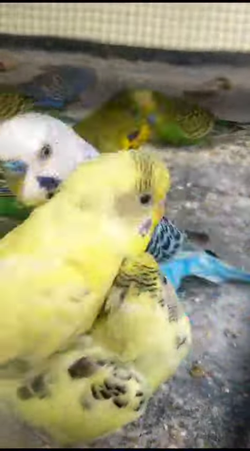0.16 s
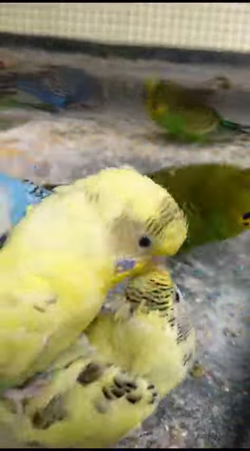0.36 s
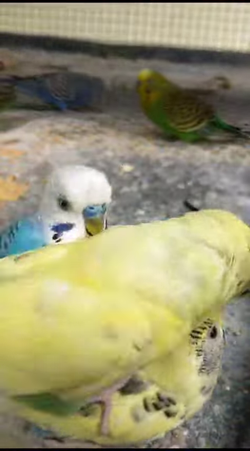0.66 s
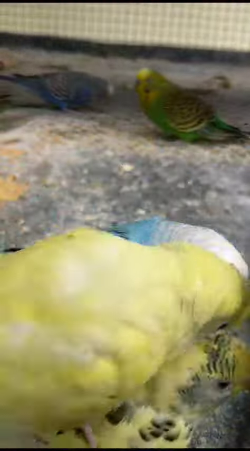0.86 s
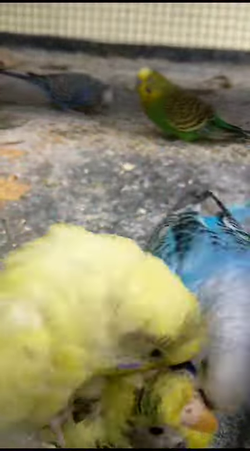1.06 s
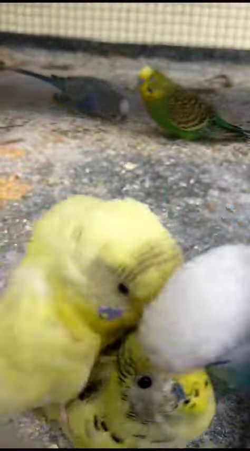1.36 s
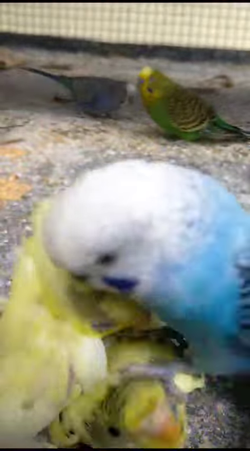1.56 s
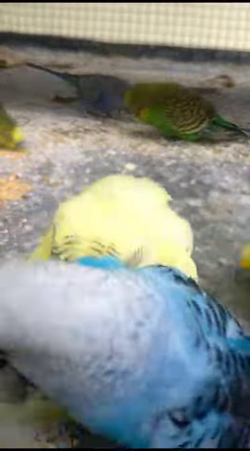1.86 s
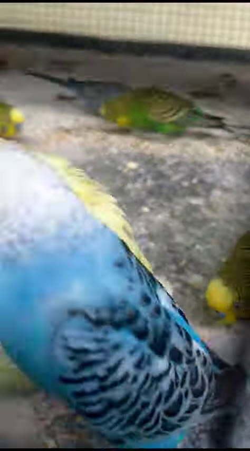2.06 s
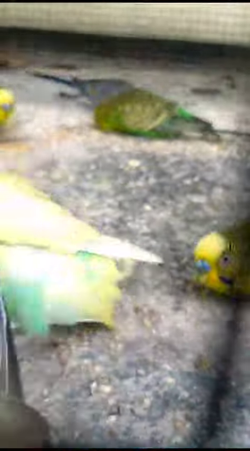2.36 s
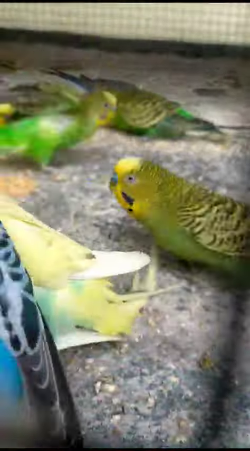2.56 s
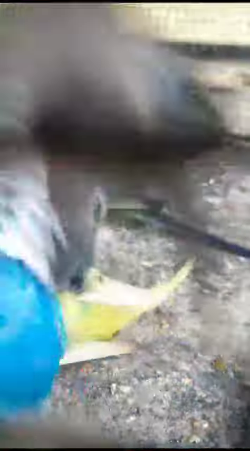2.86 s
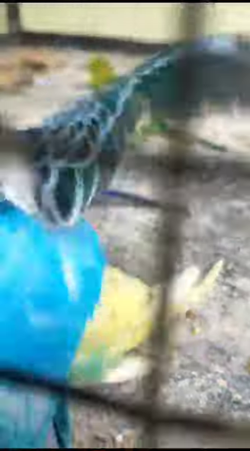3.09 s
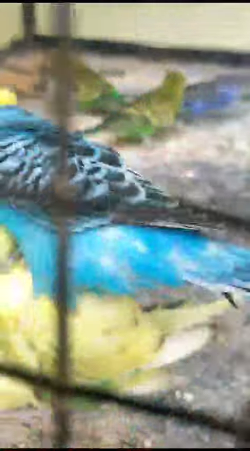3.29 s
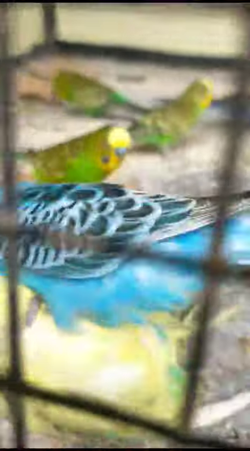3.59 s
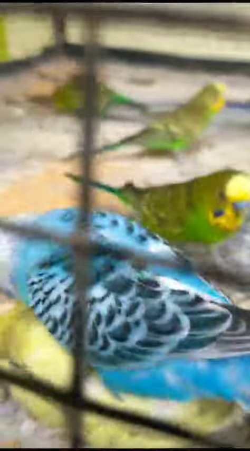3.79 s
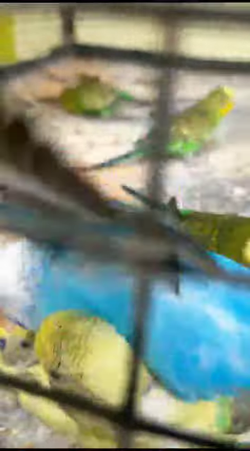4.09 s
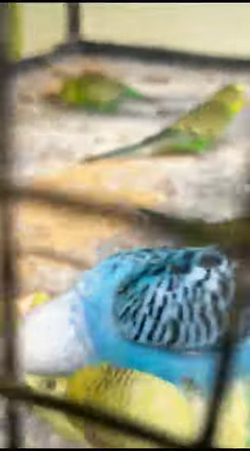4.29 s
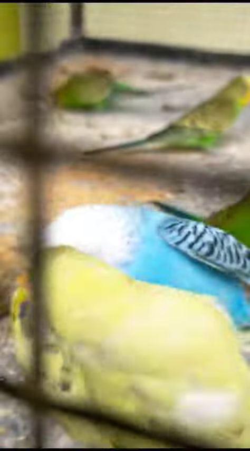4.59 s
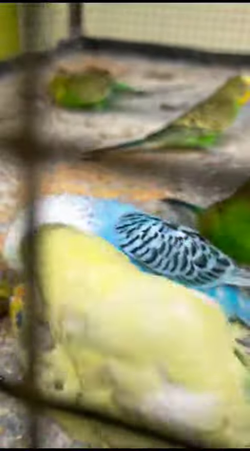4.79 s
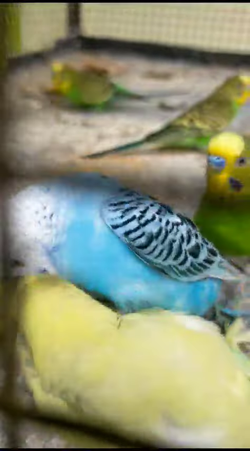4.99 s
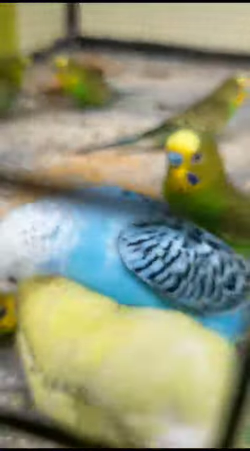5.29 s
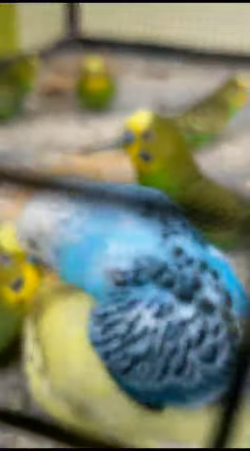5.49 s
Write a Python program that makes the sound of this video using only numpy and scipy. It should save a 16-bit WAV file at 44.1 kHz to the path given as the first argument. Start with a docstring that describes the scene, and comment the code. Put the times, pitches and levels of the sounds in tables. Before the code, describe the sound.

Budgies squawk, chirp and warble together in a dense chorus inside a wire cage, over a faint low rumble.

```python
"""A wire aviary, the microphone close to a chattering flock of small parrots.
Near birds rasp pulsed squawks, air chopped by a flapping membrane, and the syrinx sounds gliding
whistles, grating calls and low clucks. Beaks and claws tick on wire and grit. The birds behind blur
into a chorus of chirps; air and far traffic rumble below, with a faint hum."""
import sys
import numpy as np
from scipy import signal
from scipy.fft import rfft, irfft, next_fast_len
from scipy.io import wavfile
from scipy.ndimage import uniform_filter1d

SR = 44100
rng = np.random.default_rng(int(sys.argv[2]) if len(sys.argv) > 2 else 0)


def log_audio(samples):
    """Write samples as a 16-bit WAV file to the path given in sys.argv[1]."""
    # one column per channel
    frames = np.atleast_2d(samples).T
    # limit to full scale, then quantise
    limited = np.clip(frames, -1, 1)
    pcm = np.round(limited * 32767).astype(np.int16)
    wavfile.write(sys.argv[1], SR, pcm)


N = 249165

# Rasp of a squawk through throat and beak: (frequency [Hz], level [dB])
RASP_SPECTRUM = [(500, -99), (1000, -18.5), (2400, -5), (4500, -3), (6700, -5.5), (8000, -5.5), (9000, -19),
                 (11200, -14.5), (12400, -18.5), (14300, -9.5), (16000, -13)]
# Harsh squawks, close to the microphone:
# (time [s], length [s], level [dB], beak resonance [Hz], pulse depth [0-1], treble gain [dB])
NEAR_SQUAWKS = [(-.03, 0.082, -24.5, 6800, 0.66, -7), (0.046, 0.11, -32, 6740, 0, 13.5),
                (0.148, 0.13, -27, 6740, 0.14, 13), (.558, 0.04, -27, 3630, 0.8, 5),
                (0.832, 0.04, -28, 8000, 0.4, 3), (.969, 0.089, -20.5, 6560, 0.7, -3.5),
                (1.048, 0.11, -34, 5260, 0.06, 11.5), (1.134, 0.11, -26.5, 5500, 0.1, -7),
                (1.233, 0.091, -27.5, 5470, 0, -11), (1.442, 0.066, -31, 4600, 0.1, 10),
                (1.562, 0.12, -27, 6250, 0, -1.5), (1.845, 0.12, -28, 6600, 0.12, -5),
                (2.368, 0.099, -29, 6340, 0.04, 15), (2.531, 0.12, -29, 7140, 0.22, -10),
                (2.71, 0.12, -29, 6900, 0, 4.5), (3.088, 0.15, -22.5, 6470, 0.08, 0),
                (3.223, 0.096, -32, 4900, 0, 4), (3.362, 0.1, -36.5, 6340, 0.2, 14.5),
                (3.594, 0.095, -23, 6750, 0, -21), (3.668, 0.074, -38, 7160, 0.2, 13),
                (3.741, 0.08, -20.5, 6800, 0.47, 2), (3.851, 0.12, -25.5, 6600, 0.24, 12.5),
                (3.986, 0.11, -29, 6800, 0.14, 14), (4.125, 0.11, -24.5, 6350, 0.2, -22),
                (4.231, 0.076, -20.5, 5800, 0.23, 5), (4.405, 0.13, -24, 5500, 0.95, 2),
                (4.502, 0.096, -27.5, 7100, 0, 13), (4.62, 0.099, -21.5, 6500, 0.37, -8),
                (4.844, 0.089, -22.5, 6050, 0.08, 12.5), (4.978, 0.12, -24, 6600, 0.26, -29),
                (5.251, 0.08, -25, 5900, 0.2, 11.5), (5.452, 0.14, -27.5, 5300, 0.07, 1.5)]


def squawks(flaps_per_s=188, grit_db=1.4, swell_db=.5, beak_rise=1.001):
    """Turbulent air, chopped by the membrane flapping shut; the open beak rings at its own pitch."""
    out, jitter, uneven = np.zeros(N), drift(11), drift(200)
    air = tongue_and_beak(colour(rng.standard_normal(N), RASP_SPECTRUM))
    treble = signal.butter(4, 9500, "high", fs=SR, output="sos")
    paces = rng.standard_normal(len(NEAR_SQUAWKS))
    for (start, length, db, beak_hz, depth, treble_db), pace in zip(NEAR_SQUAWKS, paces):
        u, envelope = swell(length, edge_s=.04)
        envelope *= amp(db + swell_db * (u - 2.5))
        at = min(max(round(start * SR), 0), N - len(u))
        span, t = slice(at, at + len(u)), np.arange(len(u)) / SR
        phase = 2 * np.pi * flaps_per_s * (1 + .04 * pace) * t + .4 * jitter[span]
        gate = rms_one((1 - np.clip(depth, 0, 1) * np.cos(phase)) ** 1.4)
        puffs = air[span] * gate * envelope * amp(grit_db * uneven[span])   # uneven slaps roughen it
        bounce = round(SR * .0005 * np.exp(.5 * pace))   # a copy off the floor combs the rasp
        puffs[bounce:] += .3 * puffs[:-bounce]
        ring = sum(share * signal.lfilter(*signal.iirpeak(hz, Q=6, fs=SR), puffs)
                   for share, hz in ((1 - u, beak_hz / beak_rise), (u, beak_hz * beak_rise)))
        add(out, puffs + 1.74 * ring + (amp(treble_db) - 1) * signal.sosfilt(treble, puffs), start)
    return out


def tongue_and_beak(rasp, wander_db=3.2, wander_hz=45):
    """Bands of the rasp swell apart as tongue and beak move."""
    out, edges_hz = np.zeros(N), np.geomspace(700, 19000, 10)
    for k in range(len(edges_hz) - 1):
        band = signal.sosfilt(signal.butter(2, edges_hz[k:k + 2], "band", fs=SR, output="sos"), rasp)
        out += (-1) ** k * amp(wander_db * drift(wander_hz)) * band   # alternate signs join bands evenly
    return rms_one(out)


def syrinx(rows, waver, hoarse, overtone_db, edge_s):
    """The syrinx gives a near sine with weak overtones; its pitch trembles and breath roughens it."""
    out, trembles = np.zeros(N), np.array([drift(hz) for hz in (57.5, 40, 353, 25)])
    for (start, length, first_hz, last_hz, db), skip in zip(rows, rng.random(len(rows))):
        u, envelope = swell(length, edge_s)
        at = int(skip * N * .9)
        wobble, flutter, breath, flash = trembles[:, at:at + len(u)]
        glide = np.sin(np.pi / 2 * u) if last_hz > first_hz else u   # a rise settles, a fall is even
        hz = (first_hz + (last_hz - first_hz) * glide) * (1 + waver * wobble)
        phase = 2 * np.pi * np.cumsum(hz) / SR
        overtones = sum(np.sin(k * phase) / (k - 1) ** 2 * beak_gain(k * hz) for k in (2, 3, 4, 5))
        # overtones break in and out, and are stronger on low notes
        richness = amp(overtone_db + 9 * np.minimum(flash, 1.2)) * (3000 / first_hz) ** .5
        strength = amp(db + .74 * flutter) * (1 - hoarse + hoarse * breath)
        add(out, np.sqrt(2) * strength * envelope * (np.sin(phase) + richness * overtones), start)
    return out


def beak_gain(hz, ring_hz=7700, half_width_hz=800, fade_hz=14500):
    """The open beak lifts overtones near its ring; the highest fade."""
    lift = 1 + 6 / (1 + ((hz - ring_hz) / half_width_hz) ** 2)
    return lift / (1 + (hz / fade_hz) ** 12)


# Whistles of the near birds: (time [s], length [s], first pitch [Hz], last pitch [Hz], level [dB])
NEAR_WHISTLES = [(0.112, 0.048, 3270, 3530, -22.5), (0.14, 0.034, 2744, 2143, -22.5),
                 (0.164, 0.027, 1940, 2110, -27), (0.188, 0.049, 2670, 3060, -26.5),
                 (0.255, 0.052, 2236, 2295, -26.5), (0.399, 0.041, 2855, 2540, -28.5),
                 (0.407, 0.11, 1170, 1576, -41.5), (0.44, 0.03, 2700, 2810, -21),
                 (0.47, 0.064, 2840, 3755, -23), (0.598, 0.1, 2400, 2685, -38.5),
                 (0.612, 0.075, 1080, 1330, -38.5), (.672, 0.05, 1350, 1790, -35.5),
                 (.75, 0.019, 4010, 3800, -25.5), (0.794, 0.02, 1770, 2830, -27),
                 (0.806, 0.044, 2910, 2740, -20), (0.862, 0.036, 3900, 2656, -17.5),
                 (0.89, 0.034, 2800, 1430, -27.5), (1.143, 0.018, 1760, 1840, -22.5),
                 (1.158, 0.021, 2850, 2650, -20.5), (1.181, 0.036, 3020, 4100, -22.5),
                 (1.206, 0.025, 4150, 3820, -22), (1.221, 0.018, 3890, 1100, -26),
                 (1.345, 0.047, 3700, 2140, -38), (1.375, 0.049, 2113, 3110, -28),
                 (2.027, 0.027, 5030, 4860, -25.5), (2.067, 0.04, 2406, 2640, -22),
                 (2.13, 0.038, 2395, 2310, -24), (2.604, 0.053, 2510, 3100, -25.5),
                 (2.63, 0.016, 3090, 2200, -26), (2.652, 0.016, 4160, 3450, -29),
                 (2.668, 0.025, 3030, 1710, -23), (2.7, 0.025, 1740, 2073, -27),
                 (2.738, 0.046, 2900, 3060, -25), (2.778, 0.044, 1200, 1320, -41.5),
                 (3.067, 0.031, 2816, 2750, -28), (3.702, 0.047, 3180, 3800, -20.5),
                 (3.72, 0.05, 2700, 3380, -16), (3.728, 0.05, 4510, 4010, -20.5),
                 (3.855, 0.024, 2555, 2590, -21), (3.937, 0.033, 2350, 3250, -19.5),
                 (3.965, 0.01, 2980, 2050, -14), (4.015, 0.047, 2555, 2326, -23.5),
                 (4.1, 0.053, 2900, 3570, -19.5), (4.192, 0.0143, 3910, 1380, -22),
                 (4.225, 0.047, 2754, 2804, -17.5), (4.285, 0.027, 2860, 3010, -20),
                 (4.314, 0.016, 3030, 3170, -23), (4.337, 0.07, 3085, 3570, -22.5),
                 (4.414, 0.043, 1740, 2935, -23), (4.422, 0.039, 3400, 2200, -22.5),
                 (4.476, 0.047, 2880, 2626, -21), (4.522, 0.014, 2110, 2250, -20.5),
                 (4.81, 0.037, 3320, 3580, -21), (4.835, 0.038, 4090, 2620, -19.5),
                 (4.925, 0.044, 2570, 3220, -26.5), (4.981, 0.032, 3930, 3600, -23),
                 (5.066, 0.047, 2876, 2985, -26), (5.18, 0.034, 2980, 3020, -35),
                 (5.215, 0.025, 2420, 1600, -33), (5.25, 0.026, 1685, 2250, -33),
                 (5.302, 0.04, 2600, 1500, -33), (5.362, 0.066, 1470, 2635, -31),
                 (5.334, 0.1, 2435, 3310, -26), (5.418, 0.05, 2600, 1532, -25),
                 (5.585, 0.045, 2700, 2276, -24)]


def whistles():
    """Gliding notes of the syrinx with little breath in them."""
    return syrinx(NEAR_WHISTLES, waver=.02, hoarse=.28, overtone_db=-29, edge_s=.007)


# Grating calls at the front of the flock: (time [s], length [s], pitch [Hz], level [dB])
GRATING_CALLS = [(0.847, 0.027, 3930, -21), (1.077, 0.061, 3750, -25), (1.43, 0.058, 3636, -22.5),
                 (1.582, 0.067, 3580, -28), (2.027, 0.08, 2860, -24.5), (2.087, 0.037, 3860, -28),
                 (2.258, 0.039, 3264, -14.5), (2.421, 0.045, 3460, -23), (2.558, 0.068, 2713, -22.5),
                 (2.948, 0.08, 2360, -30), (3.333, 0.09, 3264, -22), (3.423, 0.049, 3210, -19.5),
                 (3.869, 0.054, 3270, -19), (4.533, 0.061, 2980, -24), (4.699, 0.047, 3296, -21.5),
                 (4.764, 0.031, 3220, -16.5), (5.011, 0.017, 3330, -12.5), (5.271, 0.021, 3300, -17.5)]


def grating_calls():
    """Hoarse calls on one trembling pitch, half lost in breath."""
    rows = [(start, length, hz, hz, db) for start, length, hz, db in GRATING_CALLS]
    return syrinx(rows, waver=.035, hoarse=.65, overtone_db=-32, edge_s=.01)


# Clucks among the near birds: (time [s], first pitch [Hz], last pitch [Hz], level [dB])
LOW_CLUCKS = [(1.46, 1320, 1170, -36), (1.525, 1400, 1370, -23), (1.537, 1436, 950, -34.5),
              (1.566, 1540, 1050, -29.5), (1.601, 1880, 1600, -29), (1.617, 1107, 2090, -24.5),
              (1.641, 2133, 1280, -26.5), (1.667, 1407, 1730, -29), (1.701, 1600, 1483, -23),
              (1.73, 1700, 2120, -27.5), (1.745, 2496, 1940, -27), (1.767, 2003, 1550, -28),
              (2.864, 1510, 1060, -37), (3.533, 1090, 1680, -29), (3.562, 1280, 1334, -27),
              (3.599, 1630, 1240, -29.5), (3.652, 1565, 1180, -29), (3.702, 1840, 2260, -24),
              (4.165, 1476, 1020, -33), (4.198, 1845, 1164, -28), (4.284, 1540, 1090, -29),
              (4.391, 1395, 1510, -31), (4.441, 1140, 1310, -30.5)]


def clucks(length_s=.0207):
    """Short low notes of the syrinx, rich in overtones."""
    rows = [(start, length_s, first_hz, last_hz, db) for start, first_hz, last_hz, db in LOW_CLUCKS]
    return syrinx(rows, waver=.045, hoarse=.4, overtone_db=-17, edge_s=.0035)


# Ticks on the wire and grit of the aviary: (time [s], crack level [dB], knock level [dB])
BEAK_AND_CLAW_TICKS = [(.568, -30, -26), (.721, -25, -34.5), (1.527, -30, -15), (1.825, -26, -40.5),
                       (2.823, -11, -12), (2.867, -36, -17), (3.051, -24.5, -25), (4.2, -17, -24)]


def ticks(crack_decay_s=.0006, knock_decay_s=.003):
    """A beak or claw strikes: a sharp crack with a dull knock under it."""
    out, t = np.zeros(N), np.arange(1300) / SR
    dull = signal.butter(2, [600, 2600], "band", fs=SR, output="sos")
    for start, crack_db, knock_db in BEAK_AND_CLAW_TICKS:
        crack = rng.standard_normal(len(t)) * np.exp(-t / crack_decay_s)
        knock = signal.sosfilt(dull, rng.standard_normal(len(t)) * np.exp(-t / knock_decay_s))
        add(out, amp(crack_db) * crack + amp(knock_db) * knock, start)
    return out


# The flock behind, further from the microphone: (time [s], level [dB])
CHORUS_LEVELS = [(0, -33.5), (.25, -33), (.55, -38.5), (.7, -45.5), (0.852, -34), (0.962, -44),
                 (1.101, -31), (1.33, -40), (1.55, -33), (1.85, -46.5), (2.067, -26.5), (2.649, -26),
                 (2.8, -37.5), (3.25, -35.5), (3.402, -24.5), (3.551, -37.5), (3.7, -26), (4.3, -29),
                 (4.5, -26.5), (4.62, -32.5), (4.801, -25.5), (5, -29), (5.4, -24.5), (5.65, -31.5)]


def chorus(chirps_per_s=170, usual_hz=2999, usual_length_s=.02422, hz_per_db=19.5):
    """Short hoarse chirps of many birds at random moments blur with the rasp of far squawks."""
    count = round(chirps_per_s * N / SR)
    timing, voice, bend, stretch, force = np.clip(rng.standard_normal((count, 5)), -2, 2).T
    start = (np.arange(count) + timing) / chirps_per_s
    times, db = np.transpose(CHORUS_LEVELS)
    excitement_db = np.interp(start, times, db) - db.mean()   # an excited flock chirps higher
    spread = np.where(voice > 0, .125, .26)   # voices spread further down than up
    first_hz = (usual_hz + hz_per_db * excitement_db) * np.exp(spread * voice)
    last_hz = first_hz * np.exp(.1436 * bend)
    length = usual_length_s * np.exp(.385 * stretch)
    chirp_db = 3.5 * force - 2 * voice ** 2   # weaker far from the usual pitch
    rows = np.transpose([start, length, first_hz, last_hz, chirp_db])
    chirps = syrinx(rows, waver=.03, hoarse=.45, overtone_db=-38, edge_s=.008)
    chirps /= np.sqrt(uniform_filter1d(chirps ** 2, size=2000) + .039)   # many voices even out
    rasp = amp(-13 + 3 * drift(8)) * rms_one(colour(rng.standard_normal(N), RASP_SPECTRUM))
    return (chirps + rasp) * amp(np.interp(np.arange(N) / SR, times, db))


def reflections(birds, t60_s=.1, level_db=-10):
    """Dense reflections off walls and floor: a noise tail that dies fast, its treble softened."""
    t = np.arange(round(.3 * SR)) / SR
    tail = rng.standard_normal(len(t)) * amp(-60 * t / t60_s) * (t > .004)
    tail = signal.lfilter([1], [1, -.4], tail)
    return amp(level_db) * signal.fftconvolve(birds, tail / np.sqrt(np.sum(tail ** 2)))[:N]


# Air, far traffic and the dull wash all round the aviary: (frequency [Hz], level [dB])
AIR_SPECTRUM = [(20, 6.5), (55, 1), (140, -6), (250, -10.5), (850, -20), (3000, -11), (7500, -29),
                (9200, -37), (14000, -17.5)]


def air_and_traffic(level_db=-39.5):
    """Air and far traffic merge into a rumble that slowly rises and falls."""
    return amp(level_db + drift(.86)) * rms_one(colour(rng.standard_normal(N), AIR_SPECTRUM))


def hum(hz=143.6, level_db=-58):
    """A faint low tone whose level wavers."""
    return amp(level_db + 3.8 * drift(3.3)) * np.sin(2 * np.pi * hz * np.arange(N) / SR)


def amp(db):
    """Gain of a level in dB."""
    return 10 ** (np.asarray(db) / 20)


def rms_one(x):
    """Scales a signal to unit rms."""
    return x / np.sqrt(np.mean(x ** 2) + 1e-20)


def colour(x, spectrum):
    """Shapes a signal by a spectrum drawn on a log-frequency axis."""
    hz, db = np.transpose(spectrum)
    size = next_fast_len(len(x))
    grid = np.log(np.arange(size // 2 + 1) * SR / size + 1)
    return irfft(rfft(x, size) * amp(np.interp(grid, np.log(hz), db)), size)[:len(x)]


def drift(rate_hz):
    """A smooth random wander of unit rms."""
    pole = np.exp(-2 * np.pi * rate_hz / SR)
    wander = signal.lfilter([1], [1, -2 * pole, pole * pole], rng.standard_normal(N + 9000))
    return rms_one(wander[9000:])


def add(out, piece, start_s):
    """Mixes a piece in at its start time."""
    at = round(start_s * SR)
    piece, at = piece[max(-at, 0):], max(at, 0)
    out[at:at + len(piece)] += piece[:max(N - at, 0)]


def swell(length_s, edge_s):
    """Progress u (0-1) through a note, and its soft-edged envelope."""
    t = np.arange(max(round(length_s * SR), 8)) / SR
    ramp = np.clip(np.minimum(t, t[-1] - t) / edge_s, 0, 1)
    return t / t[-1], np.sin(np.pi / 2 * ramp) ** 2


def scene():
    """At the microphone: the birds and their reflections over the low background."""
    birds = whistles() + squawks() + grating_calls() + clucks() + chorus() + ticks()
    background = hum() + air_and_traffic()
    return (birds + reflections(birds) + background)[None]


def record(dry, ceiling=.65, cutoff_hz=15900):
    """One microphone channel: peaks are rounded and the top is cut steeply."""
    lowpass = signal.ellip(12, .5, 70, cutoff_hz, fs=SR, output="sos")
    return signal.sosfilt(lowpass, ceiling * np.tanh(dry / ceiling))


dry = scene()
out = record(dry)
log_audio(out)
```